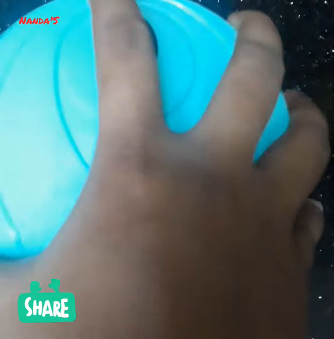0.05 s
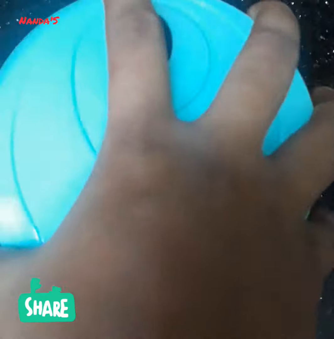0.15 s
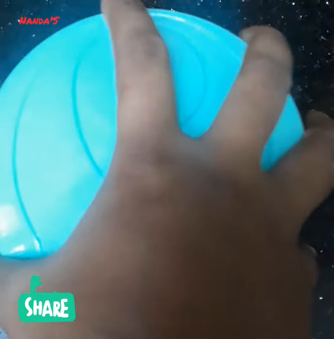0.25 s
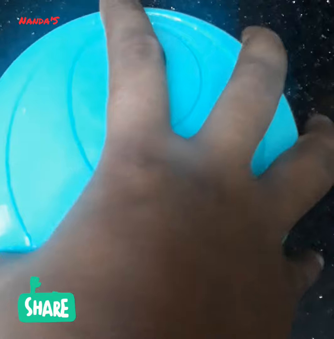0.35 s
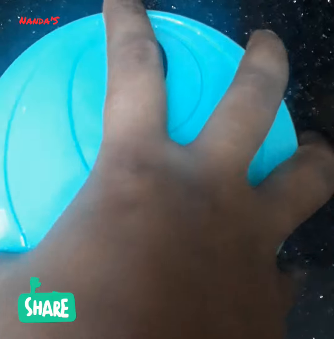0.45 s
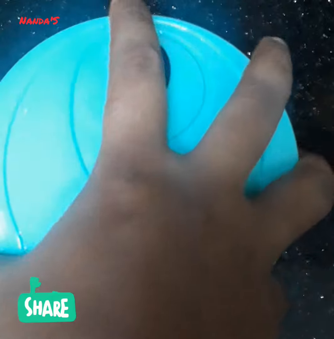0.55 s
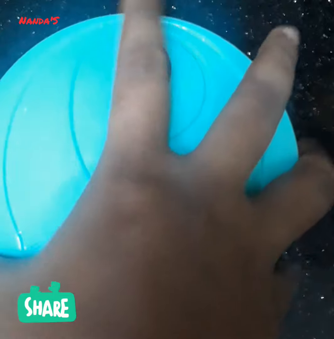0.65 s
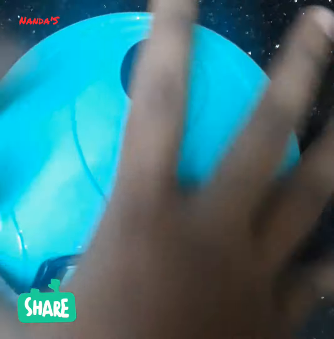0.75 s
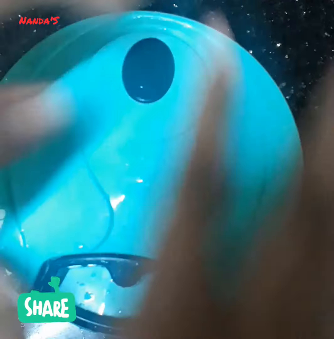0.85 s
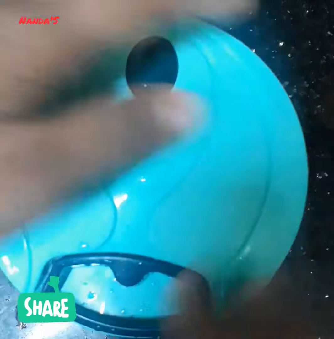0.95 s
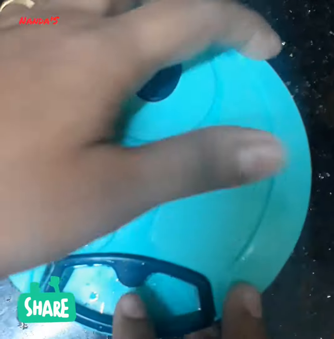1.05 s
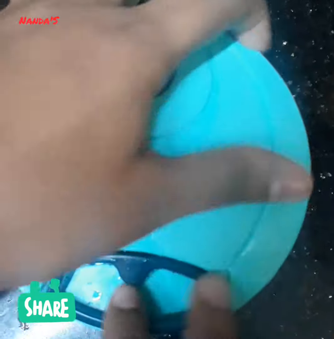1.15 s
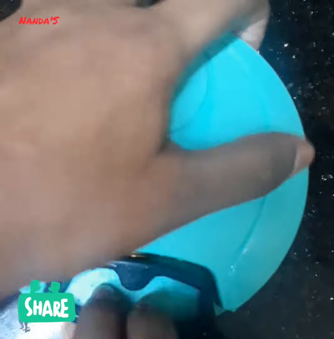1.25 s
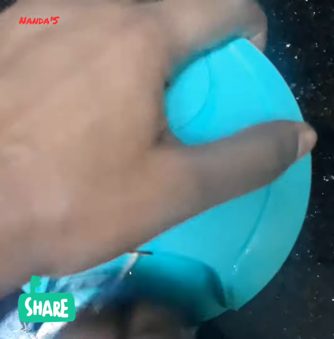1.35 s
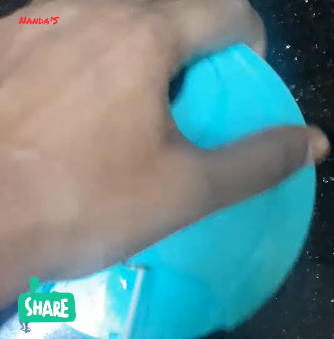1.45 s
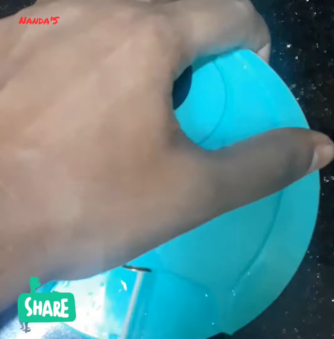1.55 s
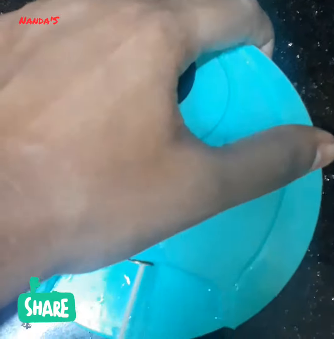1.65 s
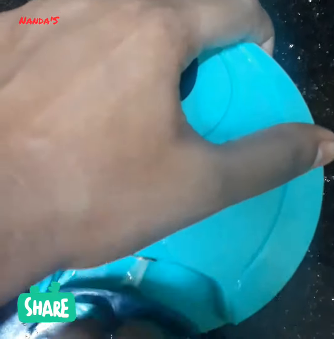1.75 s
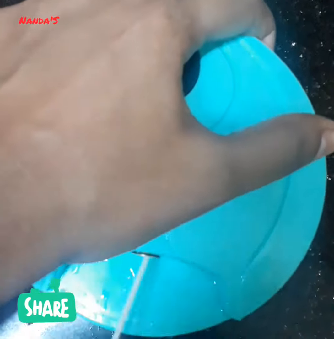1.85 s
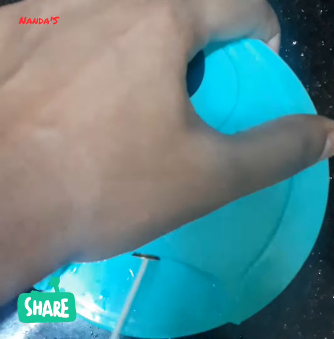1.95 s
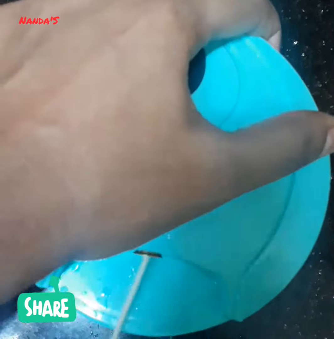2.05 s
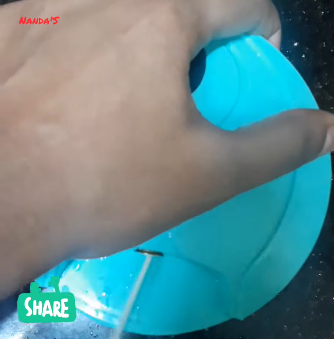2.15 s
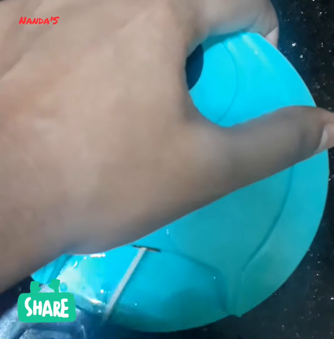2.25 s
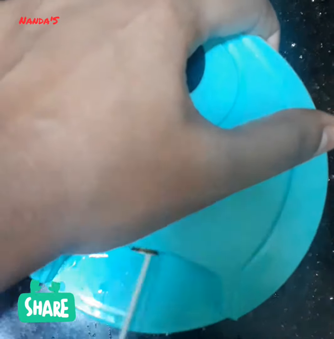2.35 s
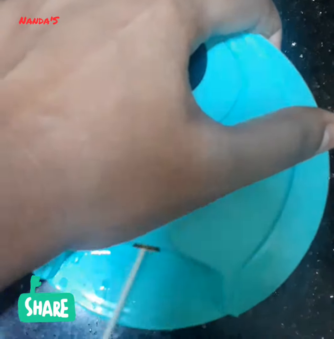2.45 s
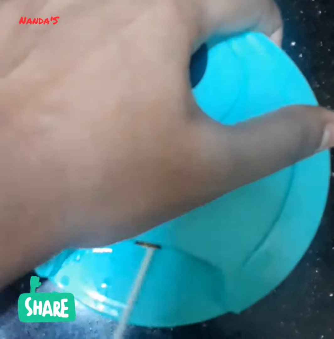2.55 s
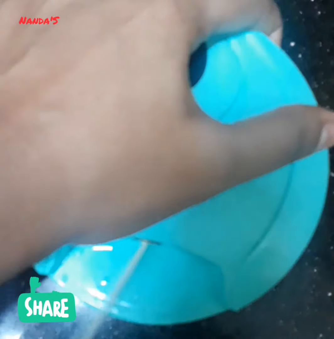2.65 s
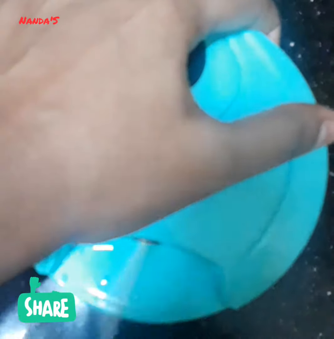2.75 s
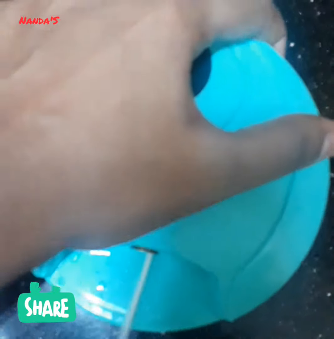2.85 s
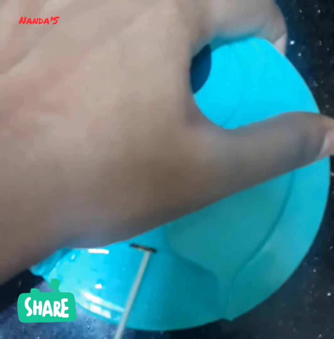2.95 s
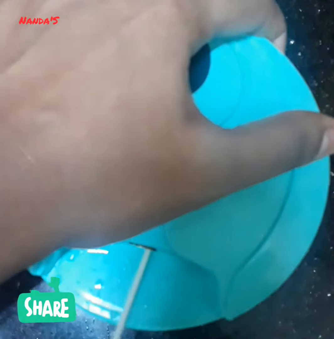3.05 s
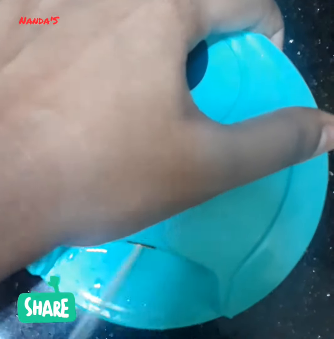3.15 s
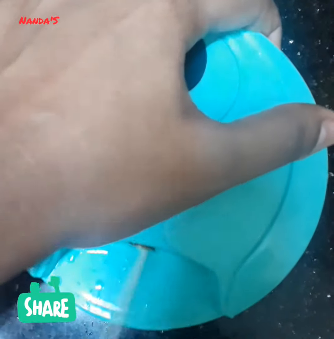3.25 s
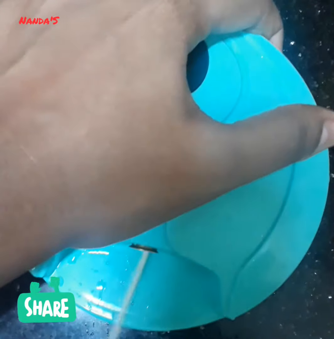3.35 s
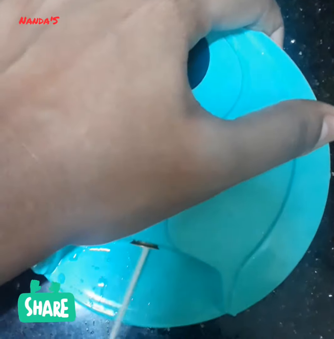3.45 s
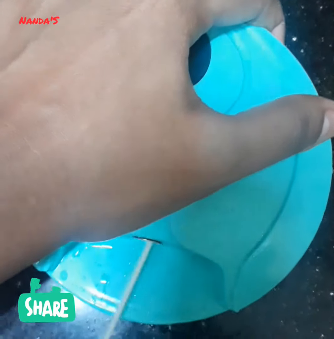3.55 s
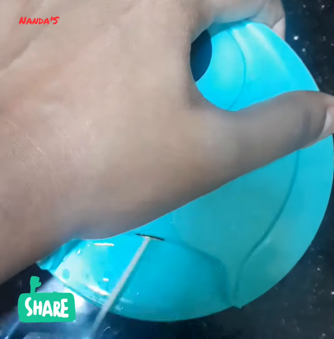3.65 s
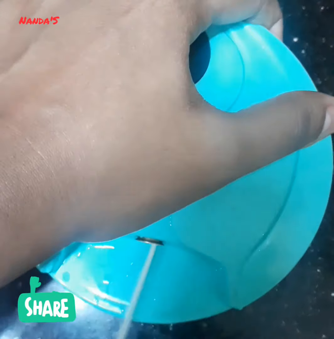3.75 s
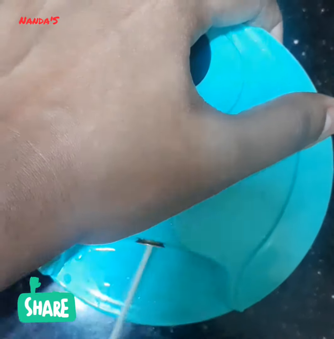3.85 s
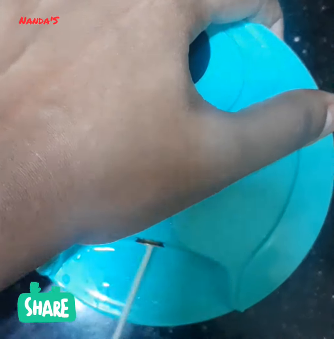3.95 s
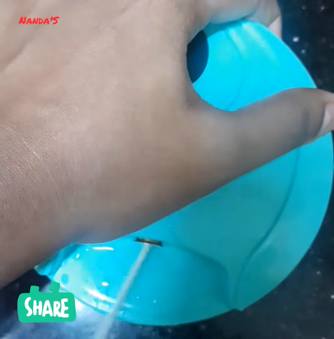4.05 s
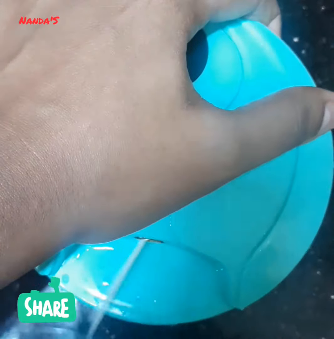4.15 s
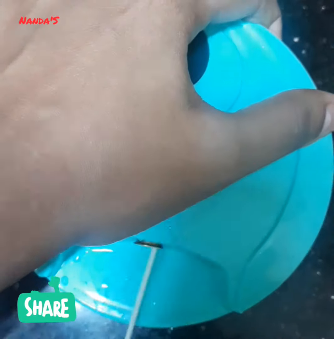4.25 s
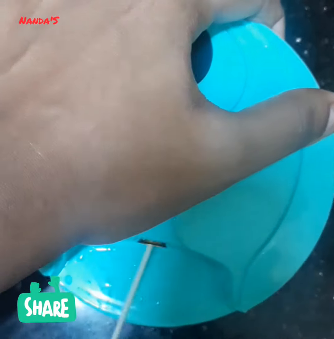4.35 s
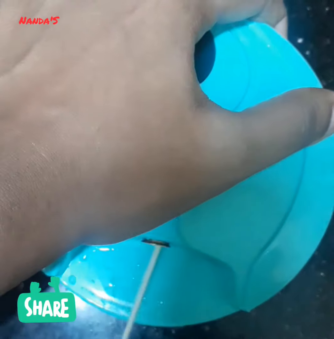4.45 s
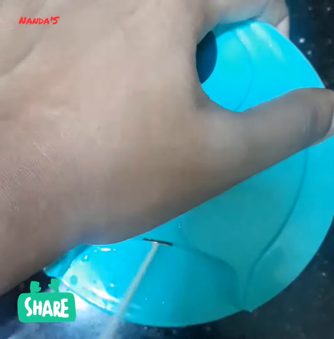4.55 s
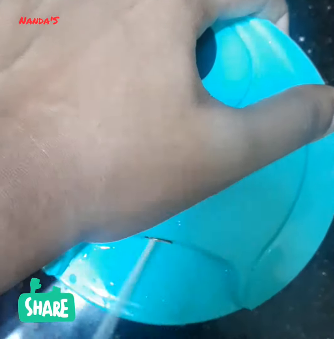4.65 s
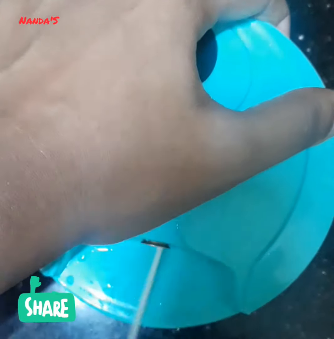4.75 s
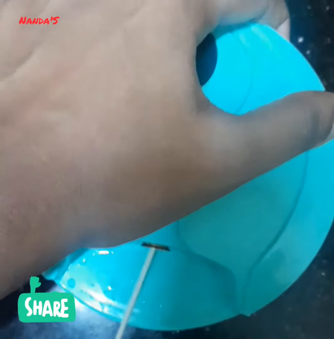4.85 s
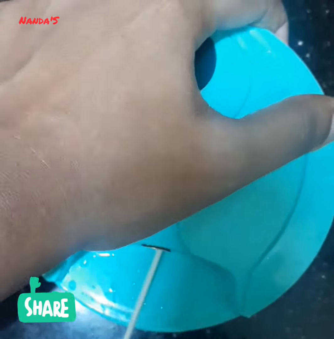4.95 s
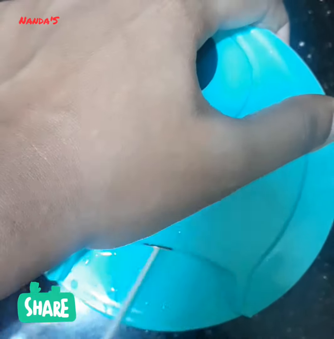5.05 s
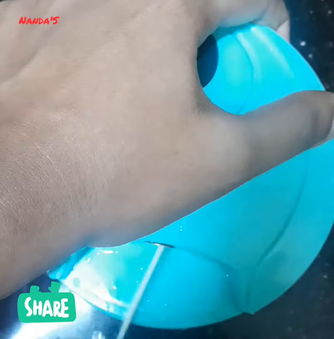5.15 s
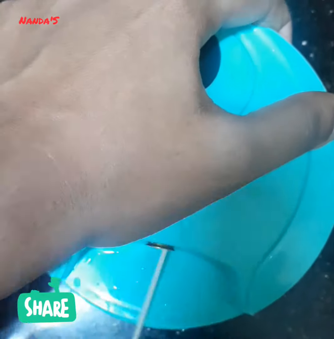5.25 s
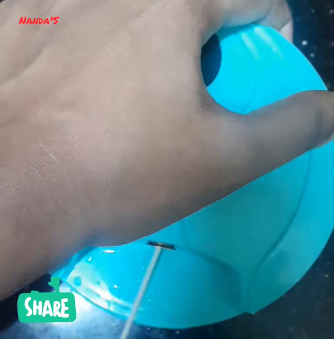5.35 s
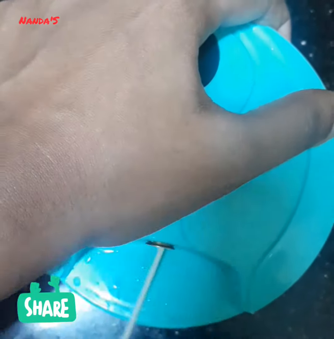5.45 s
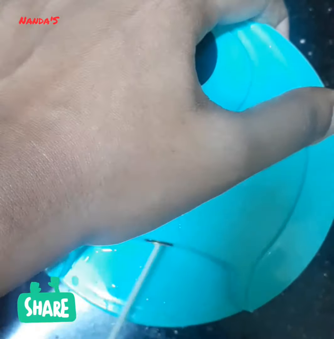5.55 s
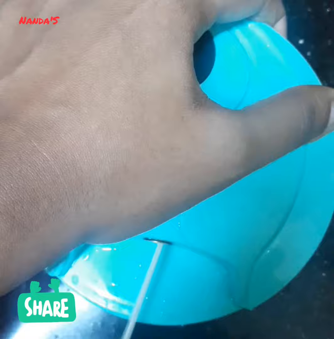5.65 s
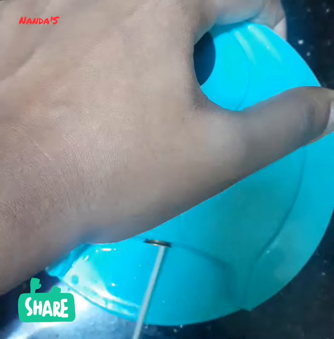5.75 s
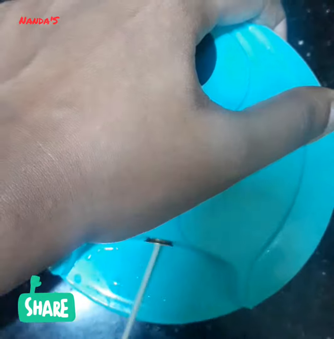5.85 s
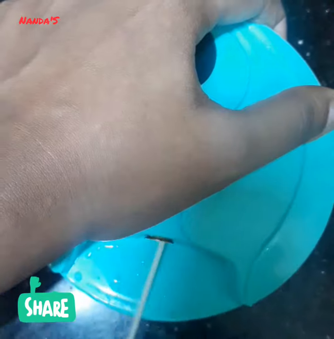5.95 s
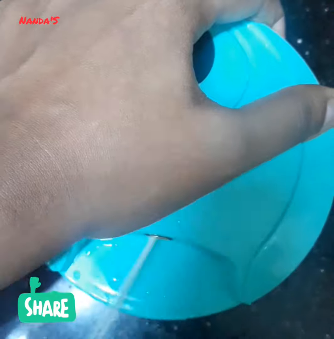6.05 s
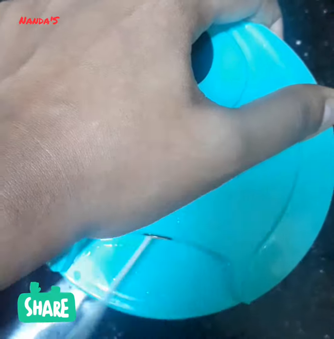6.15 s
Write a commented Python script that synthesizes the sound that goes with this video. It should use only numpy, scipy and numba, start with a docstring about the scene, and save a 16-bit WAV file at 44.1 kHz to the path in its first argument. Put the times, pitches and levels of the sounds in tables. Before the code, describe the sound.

A hand chopper's lid snaps on, and its cord is pulled repeatedly, blades grinding and spring whirring back in a small kitchen.

```python
"""Three plastic clicks and a snap: the lid of a pull-cord chopper is pressed home, on a stone counter in a
small hard kitchen. After a few fingertip taps the cord is pulled ten times. On each pull the clutch bites
with a knock, and gears and blades grind in the bowl. Then a spring reels the cord back with a bright
ratchet whirr and a sinking squeak. Room air and faint far tones lie underneath."""
import sys
import numpy as np
from scipy import signal
from scipy.fft import rfft, irfft
from scipy.io import wavfile
from numba import njit

SR = 44100
rng = np.random.default_rng(int(sys.argv[2]) if len(sys.argv) > 2 else 0)


def store_pcm(level_fs):
    """Save levels as 16-bit WAV."""
    pcm = np.round(np.clip(level_fs, -1, 1) * 32767).astype(np.int16)
    wavfile.write(sys.argv[1], SR, np.atleast_2d(pcm).T)


N = 273420


def amp(db):
    """Decibels to gain."""
    return 10 ** (np.asarray(db) / 20)


def rms_one(x):
    """Scale to unit rms."""
    return x / np.sqrt(np.mean(x ** 2) + 1e-20)


def butter(x, order, hz, kind="low"):
    """Butterworth filter."""
    return signal.sosfilt(signal.butter(order, hz, kind, fs=SR, output="sos"), x)


def body(x, spectrum, modes=()):
    """Minimum-phase colouring by a spectrum with resonant lifts; white noise keeps its power."""
    size = 8192
    hz = np.maximum(np.arange(size // 2 + 1) * SR / size, 1)
    curve_hz, curve_db = np.transpose(spectrum)
    db = np.interp(np.log(hz), np.log(curve_hz), curve_db)
    for centre, width, lift in modes:
        db += lift / (1 + (2 * (hz - centre) / width) ** 2)
    cepstrum = irfft(db * np.log(10) / 20)
    cepstrum[1:size // 2] *= 2
    cepstrum[size // 2 + 1:] = 0
    response = irfft(np.exp(rfft(cepstrum)))
    return signal.fftconvolve(x, response / np.linalg.norm(response))[:N]


def drift(rate_hz):
    """Smooth random wander, rms 1."""
    r = np.exp(-2 * np.pi * rate_hz / SR)
    return rms_one(signal.lfilter([1], [1, -2 * r, r * r], rng.standard_normal(N + SR))[SR:])


def grains(per_s, spread_db, lumpy_db, lump_hz):
    """Random contacts of uneven size, swelling in lumps; rms 1."""
    sizes = amp(spread_db * np.minimum(rng.exponential(1, N), 5)) * rng.choice([-1, 1], N)
    hits = rng.random(N) < per_s / SR
    return rms_one(sizes * hits * amp(lumpy_db * drift(lump_hz)))


def bursts(times, db, t60_s, rise_s):
    """Short noise bursts with a linear attack and an exponential decay."""
    out = np.zeros(N)
    t = np.arange(9000) / SR
    noise = rng.standard_normal((len(times), len(t))) * np.minimum(t / rise_s, 1)
    for start, level, t60, burst in zip(*np.broadcast_arrays(times, db, t60_s), noise):
        i = round(start * SR)
        out[i:i + len(t)] += (amp(level - 60 * t / t60) * burst)[:N - i]
    return out


def stages(times, db, fade_s):
    """Join stage times and levels (stages x strokes) into one dB envelope, silent between strokes."""
    times = np.array([times[0] - fade_s, *times, times[-1] + fade_s])
    silence = np.full_like(times[0], -90)
    db = np.array(np.broadcast_arrays(silence, *db, silence))
    return np.interp(np.arange(N) / SR, times.T.ravel(), db.T.ravel())


def held(start, values):
    """One value per stroke, switching 20 ms ahead of each start."""
    stroke = np.searchsorted(start - .02, np.arange(N) / SR) - 1
    return values[np.maximum(stroke, 0)]


@njit
def glide(x, hz, r, sr):
    """A resonance whose centre and pole radius move; white noise keeps its power."""
    out = np.zeros(len(x))
    for i in range(2, len(x)):
        push = np.sqrt((1 - r[i] ** 2) / 2) * (x[i] - x[i - 2])
        out[i] = push + 2 * r[i] * np.cos(2 * np.pi * hz[i] / sr) * out[i - 1] - r[i] ** 2 * out[i - 2]
    return out


# Colour of the room air: freq_hz, level_db
AIR_SPECTRUM = [(15, -32), (25, -19), (228, -1.5), (306, -0.5), (484, -3), (525, -2.5), (617, -9),
                (1280, -8.5), (1630, -5), (1810, -9.5), (4530, -13), (7980, -36), (15700, -29)]
# Faint far tones: pitch_hz, width_hz, level_db
FAR_TONES = [(570, 6, -81.5), (1420, 6.2, -75), (1468, 13, -59), (1590, 21, -74)]
# Their shared fader curve: time_s, gain_db
FAR_SWELL = [(0, 6), (.6, -16), (.75, -14), (1.05, 0), (1.2, -3.5), (1.3, -5), (6.2, -4)]

def room_tone():
    """A bed of room air, with narrow bands of noise wavering like far-off tones."""
    out = amp(-58 + 1.4 * drift(5.2)) * body(rng.standard_normal(N), AIR_SPECTRUM)
    swell = amp(np.interp(np.arange(N) / SR, *np.transpose(FAR_SWELL)))
    for hz, width, db in FAR_TONES:
        r = np.exp(-np.pi * width / SR)
        poles = [1, -2 * r * np.cos(2 * np.pi * hz / SR), r * r]
        tone = signal.lfilter([1, 0, -1], poles, rng.standard_normal(N))
        out += amp(db) * swell * rms_one(tone)
    return out


def kitchen(x):
    """Diffuse echoes off hard walls: a noise tail whose treble dies sooner."""
    low_t60_s, treble_t60_s = 0.51, 0.44
    t = np.arange(SR // 2) / SR
    noise = rng.standard_normal(len(t)) * np.minimum(t / 0.0009, 1)
    low = butter(noise, 2, 5000)
    tail = low * amp(-60 * t / low_t60_s) + (noise - low) * amp(-60 * t / treble_t60_s)
    return signal.fftconvolve(x, tail / np.linalg.norm(tail))[:N]


# Fingertips on lid and handle: start_s, level_db, low_edge_hz, high_edge_hz
FINGER_TAPS = [(.588, -47, 600, 2200), (.679, -37.5, 860, 2630), (1.217, -45, 296, 4550),
               (1.231, -40.5, 3780, 4950), (1.248, -42, 800, 3200)]

def finger_taps():
    """Fingertips tick softly on the plastic, each in its own band."""
    return sum(butter(bursts([start], db + 8, t60_s=0.05, rise_s=0.00089), 4, [low, high], "band")
               for start, db, low, high in FINGER_TAPS)


# Catches snapping in: start_s, level_db, pitch_hz, tone_relative_db, edge_relative_db, crack_t60_s
LID_CATCHES = [(0.036, -18, 559, -6, -12, 0.072), (0.139, -15.5, 474, -8, -18, 0.11),
               (0.184, -18, 478, -9, -11.5, 0.13), (0.222, -5, 1020, -35, -9, 0.26)]
# Colour of the lid's crack: freq_hz, level_db
LID_SPECTRUM = [(35, -61), (60, -3), (299, -3.5), (574, -5.5), (725, -3.5), (873, -2.5), (1030, 0.5),
                (1270, -6), (2110, -1.5), (2490, -3.5), (4150, -8.5), (7790, -41), (15700, -44)]

def lid_catches():
    """Each catch cracks through the lid with a bright edge; the air beneath rings short and hollow."""
    start, db, pitch_hz, tone_db, edge_db, t60 = np.transpose(LID_CATCHES)
    crossover_hz, tone_t60_s = 4500, 0.092
    crack = body(bursts(start, db - 12.5, t60, rise_s=0.0005), LID_SPECTRUM)
    edge = body(bursts(start, db + edge_db + 3.5, t60, rise_s=0.00072), LID_SPECTRUM)
    out = butter(crack, 4, crossover_hz) + butter(edge, 4, crossover_hz, "high")
    t = np.arange(9000) / SR
    for at, hz, level in zip(start, pitch_hz, db + tone_db):
        i = round(at * SR)
        out[i:i + len(t)] += amp(level - 60 * t / tone_t60_s) * np.sin(2 * np.pi * hz * t)
    return out


def knock(start, db, thud_db, tick_db):
    """A crack through the bowl, with a low thud and a bright tick set relative to it."""
    crack = bursts(start, db - 14.5, t60_s=0.056, rise_s=0.0013)
    thud = bursts(start, db + thud_db - 14, t60_s=0.17, rise_s=0.0015)
    tick = bursts(start, db + tick_db - 9.5, t60_s=0.048, rise_s=.0007)
    return (body(crack, GRIND_SPECTRUM, BOWL_MODES) + body(thud, RUMBLE_SPECTRUM, BOWL_MODES)
            + body(tick, SIZZLE_SPECTRUM, REEL_MODES))


# Handle, clutch, engaging gears and blades knocking in the bowl: start_s, level_db
MECHANISM_KNOCKS = [(1.337, -22.5), (1.353, -15), (1.387, -9), (1.445, -12), (1.701, -23), (1.818, -12),
                    (1.849, -20), (1.868, -9), (1.913, -29), (2.011, -14), (2.369, -4.5), (2.504, -10),
                    (2.847, -10), (3.308, -18), (3.406, -15), (3.828, -19), (3.859, -8), (4.203, -13),
                    (4.256, -7), (4.351, -5.5), (4.82, -10), (5.376, -3), (5.691, -7), (5.833, -12)]

def knocks():
    """The pawl ticks, the clutch bites; handle, clutch, engaging gears and blades knock in the bowl."""
    pawl_s = np.transpose(CORD_REWINDS)[0] - 0.021  # just before each rewind
    pawl = body(bursts(pawl_s, db=-48, t60_s=.03, rise_s=.0007), SIZZLE_SPECTRUM, REEL_MODES)
    bite_s, bite_db, thud_db = np.transpose(CORD_PULLS)[:3]
    bites = knock(bite_s, bite_db, thud_db, tick_db=-27)
    mechanism = knock(*np.transpose(MECHANISM_KNOCKS), thud_db=-18, tick_db=-30)
    return pawl + bites + mechanism


def reel_squeak(rub, start, start_hz, width_hz):
    """Rubbing rings the reel's resonance, which sinks and narrows as the spring unwinds."""
    rest_hz, rest_width_share, sink_s = 3815, .55, 0.093
    age_s = np.maximum(np.arange(N) / SR - held(start, start), 0)
    wound = np.exp(-age_s / sink_s)
    hz = rest_hz + wound * held(start, start_hz - rest_hz)
    width = held(start, width_hz) * (rest_width_share + (1 - rest_width_share) * wound)
    return glide(rub, hz, np.exp(-np.pi * width / SR), SR)


# Colour of the ratchet whirr: freq_hz, level_db
RATCHET_SPECTRUM = [(35, -85), (60, -24.5), (255, -9), (520, -15.5), (700, -9.5), (1080, -6.5),
                    (1800, -1.5), (2800, -1.5), (3500, -5), (4300, 0.5), (5000, -6), (6000, -9),
                    (7800, -29.5), (10000, -32), (17000, -80)]
# Bright sizzle of spring, ticks and grinding edges: freq_hz, level_db
SIZZLE_SPECTRUM = [(4000, -22.5), (6500, -3.5), (8000, -15), (9400, -9.5), (10900, -3.5), (12000, 0),
                   (13100, -9.5), (13900, -15), (15800, -15)]
# Resonances of reel and spring: pitch_hz, width_hz, lift_db
REEL_MODES = [(7610, 130, 3), (8250, 150, 5), (9940, 100, 4), (11500, 300, 8), (12000, 1500, 3),
              (12700, 120, 10), (13000, 100, 5), (14600, 200, 10), (14950, 200, 9)]
# The cord reeling in: start_s, spin_up_s, length_s, level_db, onset_relative_db, sag_db_per_s,
# sizzle_relative_db, squeak_start_hz, squeak_width_hz, squeak_relative_db
CORD_REWINDS = [(1.663, 0.077, .13, -32, -6, -28, -15, 3940, 150, -3.5),
                (2.109, 0.038, 0.18, -22.5, -7, -68, -13.5, 3750, 70, -6.5),
                (2.549, .04, 0.22, -21.5, -4, -37, -15, 4140, 200, -5),
                (3.029, 0.076, 0.22, -21.5, -5, -59, -13, 4080, 200, -4.5),
                (3.508, 0.048, .21, -22.5, -2, -35, -12, 4170, 129, -1.5),
                (3.985, 0.032, .21, -21, -6, -29, -13.5, 4210, 150, -2.5),
                (4.455, .04, 0.21, -21.5, -7, -37, -11, 4300, 250, -1),
                (4.942, 0.043, .24, -20, -6, -52, -11.5, 4250, 250, -3.5),
                (5.46, 0.028, 0.22, -19.5, -5, -38, -15, 4220, 290, -5),
                (5.953, 0.041, 0.25, -21.5, -12, -28, -11, 4200, 219, -4)]

def cord_rewinds():
    """The pawl skips over the reel and rings the bowl, the spring sizzles, the reel's rub squeaks."""
    (start, spin_up, length, db, onset_db, sag,
     sizzle_db, squeak_hz, width_hz, squeak_db) = np.transpose(CORD_REWINDS)
    brake_s, brake_db, fade_s = 0.037, -11.5, 0.0067  # the hand brings the handle to rest
    end = start + length
    times = [start, start + spin_up, end - brake_s, end]
    sagged_db = sag * (length - spin_up - brake_s)
    run_db = [0, sagged_db, sagged_db + brake_db]
    speed_db = stages(times, [onset_db, *run_db], fade_s)
    rub_db = stages(times, [0.87 * onset_db, *run_db], fade_s)
    spring_db = held(start, sizzle_db) + 2.6 * speed_db  # the sizzle rises steeply with speed
    level = amp(held(start, db))
    pawl = level * amp(speed_db) * grains(per_s=5000, spread_db=2.5, lumpy_db=1.96, lump_hz=35)
    rub = level * amp(rub_db) * grains(per_s=3000, spread_db=1.2, lumpy_db=0.2, lump_hz=55)
    spring = level * amp(spring_db) * grains(per_s=3400, spread_db=-0.5, lumpy_db=1.5, lump_hz=140)
    squeak = amp(held(start, squeak_db)) * reel_squeak(rub, start, squeak_hz, width_hz)
    return body(pawl, RATCHET_SPECTRUM, BOWL_MODES) + squeak + body(spring, SIZZLE_SPECTRUM, REEL_MODES)


# Colour of gears and blades grinding: freq_hz, level_db
GRIND_SPECTRUM = [(240, -67), (400, -6), (513, -13.5), (700, -1.5), (931, -7), (1160, -2.5), (2120, -5),
                  (3110, -4), (3520, -3), (4860, -8.5), (7800, -36.5), (10100, -68), (17200, -120)]
# Low end of the bowl on the counter: freq_hz, level_db
RUMBLE_SPECTRUM = [(18, -48), (30, -22), (70, -21), (101, -12), (220, -8.5), (254, -0.5), (381, -15.5),
                   (520, -17), (680, -20), (1140, -120)]
# Resonances of bowl and lid: pitch_hz, width_hz, lift_db
BOWL_MODES = [(258.2, 19.4, 5.5), (312, 14, 1.5), (669, 35, 2.5), (1173, 26, 4.5), (1350, 67, 1),
              (1480, 130, 1.5), (1840, 34, 5.5), (2090, 97, 2.5), (2410, 130, 3), (2790, 40, 3.5),
              (3057, 95, -1.5), (3240, 24, 9), (4400, 31, -3.5)]
# Pulls, from the clutch's bite on: start_s, bite_db, thud_relative_db, slack_s, speed_up_s, full_speed_s,
# grind_db, slack_relative_db, swell_relative_db, rumble_relative_db
CORD_PULLS = [(1.371, -7, -32, 0.04, 0.11, 0.051, -25.5, -10.5, 1.5, -8),
              (1.803, -10, -20, 0.048, 0.056, 0.13, -22, -18, 2, -10.5),
              (2.312, -8, -17.5, 0.047, 0.036, 0.1, -18.5, -14.5, -3, -12.5),
              (2.785, -3.5, -17, 0.029, 0.031, .13, -22.5, -11.5, 3, -12),
              (3.255, -5.5, -15, 0.029, 0.029, 0.14, -20.5, -18.5, -2.5, -13),
              (3.736, -6, -9, 0.029, 0.034, .13, -22.5, -10.5, 2, -11.5),
              (4.209, -5.5, -11.5, 0.046, .035, 0.11, -21, -13.5, -0.5, -10.5),
              (4.689, -6, -15, 0.022, 0.076, 0.09, -21.5, -14, -0.5, -13),
              (5.192, -3.5, -34, 0.029, 0.066, 0.11, -21, -12, -2.5, -11.5),
              (5.696, -5, -14, 0.027, 0.084, 0.089, -21, -12.5, 1, -13)]

def cord_pulls():
    """Gear teeth and blades shake the bowl; its low modes rumble against the counter."""
    start, _, _, slack, speed_up, full_speed, db, slack_db, swell_db, rumble_db = np.transpose(CORD_PULLS)
    slowing_s, slowing_db = 0.06, -12  # the arm slows before the cord is let go
    times = np.cumsum([start, slack, speed_up, full_speed, np.full_like(start, slowing_s)], axis=0)
    effort_db = stages(times, [slack_db, slack_db, 0, swell_db, slowing_db], fade_s=0.024)
    # Rumble and bright edges follow only part of the effort's swing.
    wobble_db = held(start, rumble_db) + 0.69 * effort_db
    edges_db = -32.5 + 0.59 * effort_db
    level = amp(held(start, db))
    teeth = level * amp(effort_db) * grains(per_s=5000, spread_db=2.0, lumpy_db=1.58, lump_hz=78)
    wobble = level * amp(wobble_db) * grains(per_s=900, spread_db=2.0, lumpy_db=0.5, lump_hz=200)
    edges = level * amp(edges_db) * grains(per_s=3000, spread_db=3.0, lumpy_db=3.5, lump_hz=24)
    gear_case = [(2930, 770, 5.6)]  # sings under load: pitch_hz, width_hz, lift_db
    grind = body(teeth, GRIND_SPECTRUM, BOWL_MODES + gear_case)
    return grind + body(wobble, RUMBLE_SPECTRUM, BOWL_MODES) + body(edges, SIZZLE_SPECTRUM)


def wandering_contact(x, depth_db, rate_hz):
    """The point of contact wanders, so each band swells and fades by itself."""
    edges_hz = np.geomspace(500, 7000, 9)
    out = x.copy()
    for low, high in zip(edges_hz, edges_hz[1:]):
        out += butter(x, 1, [low, high], "band") * (amp(depth_db * drift(rate_hz)) - 1)
    return out


def scene():
    """The chopper and its kitchen echoes over the room tone, in mono."""
    strokes = wandering_contact(cord_pulls() + cord_rewinds(), depth_db=1.5, rate_hz=9.5)
    chopper = strokes + knocks() + lid_catches() + finger_taps()
    return (chopper + amp(-7.5) * kitchen(chopper) + room_tone())[None]


def record(dry):
    """Peaks are rounded, the bass rolls off over the amplifier's low noise, the top is cut steeply."""
    low_cut_hz, high_cut_hz = 126, 15730
    rounded = 0.57 * np.tanh(dry / 0.62)
    thinned = butter(rounded, 3, low_cut_hz, "high")
    amplifier_noise = amp(-75) * rms_one(butter(rng.standard_normal(N), 2, 70))
    high_cut = signal.ellip(12, .5, 70, high_cut_hz, fs=SR, output="sos")
    return signal.sosfilt(high_cut, thinned + amplifier_noise)


dry = scene()
out = record(dry)
store_pcm(out)
```